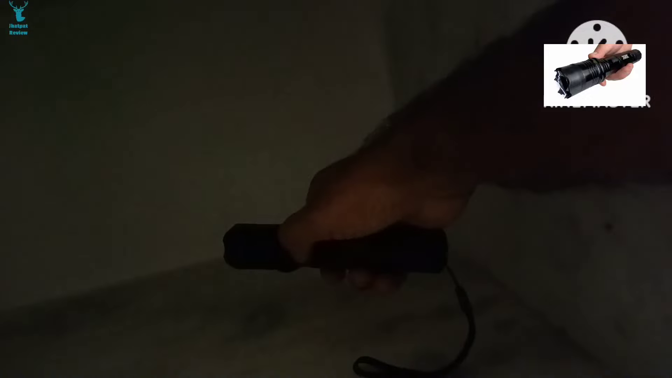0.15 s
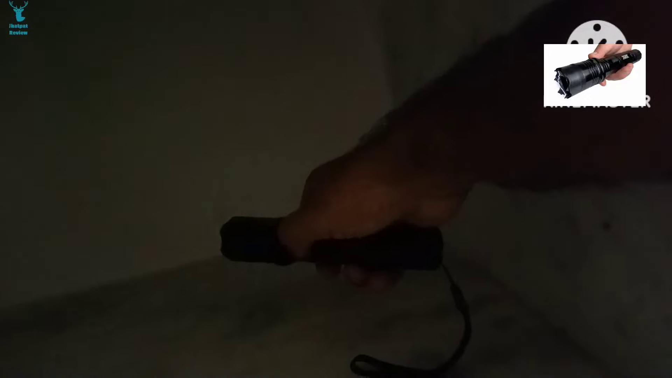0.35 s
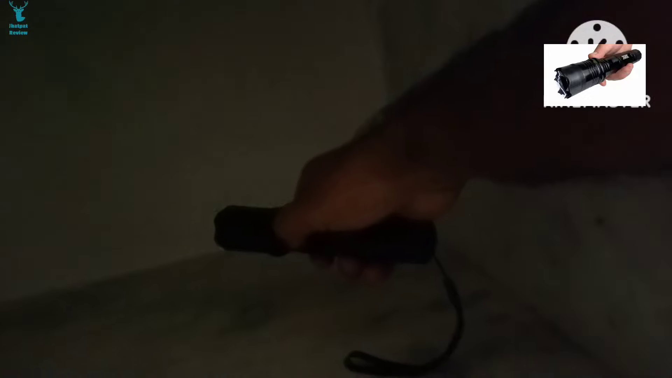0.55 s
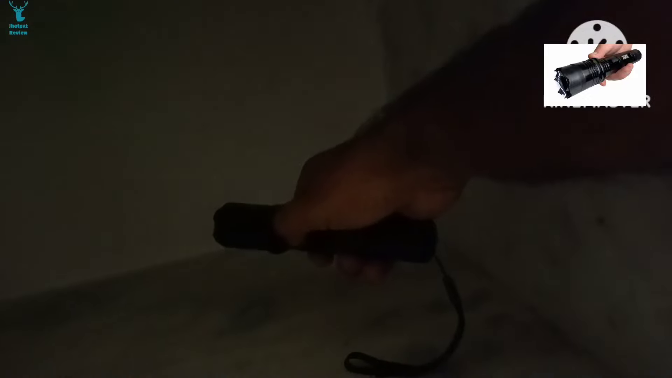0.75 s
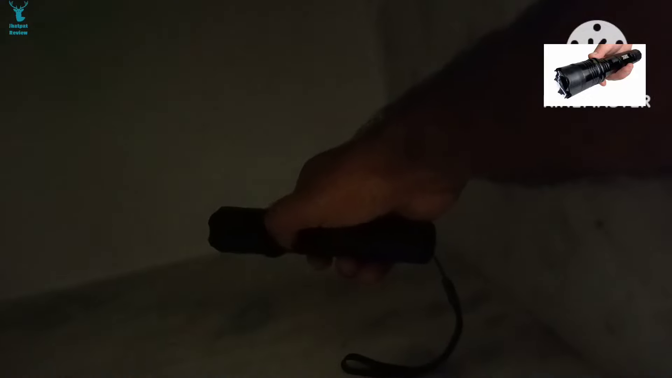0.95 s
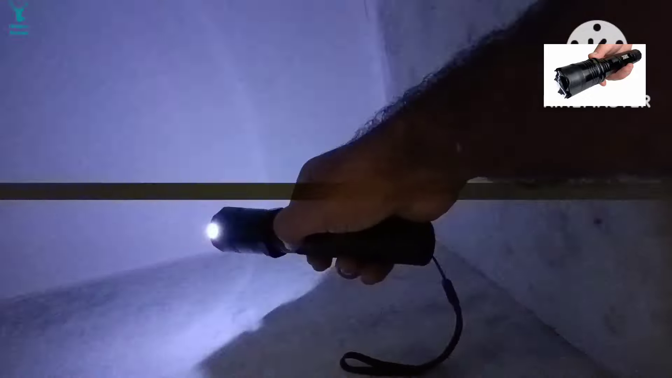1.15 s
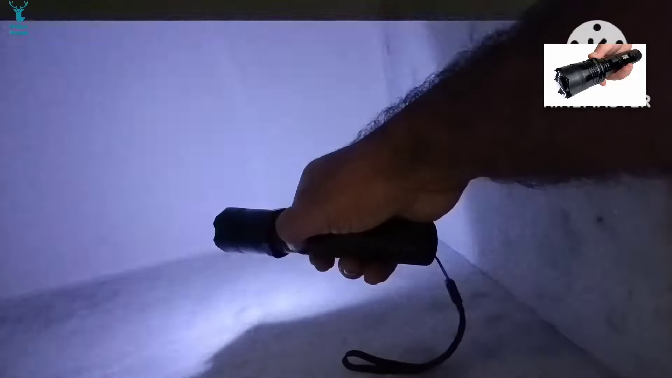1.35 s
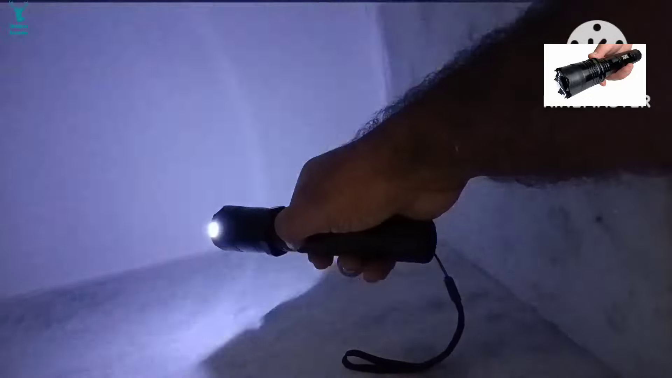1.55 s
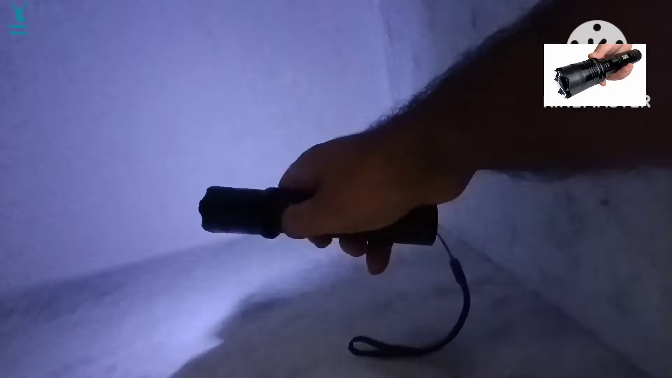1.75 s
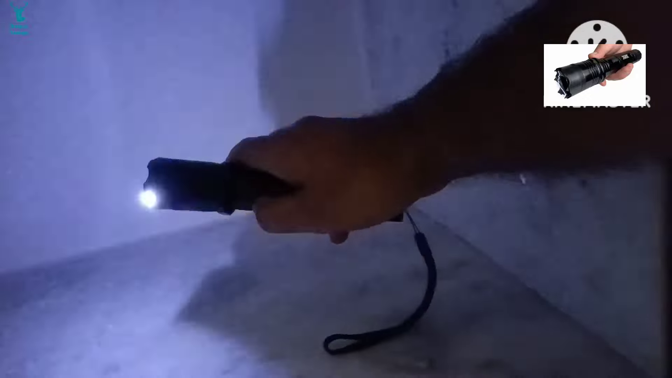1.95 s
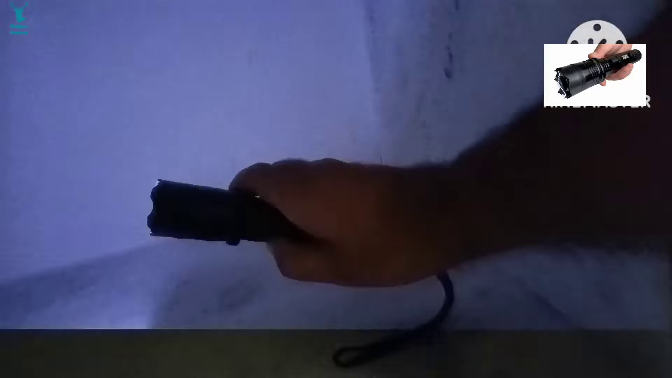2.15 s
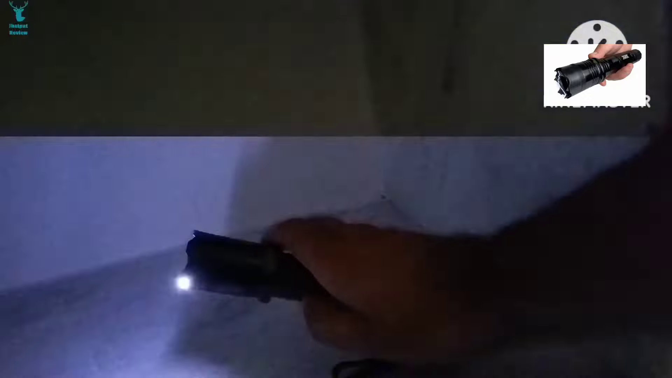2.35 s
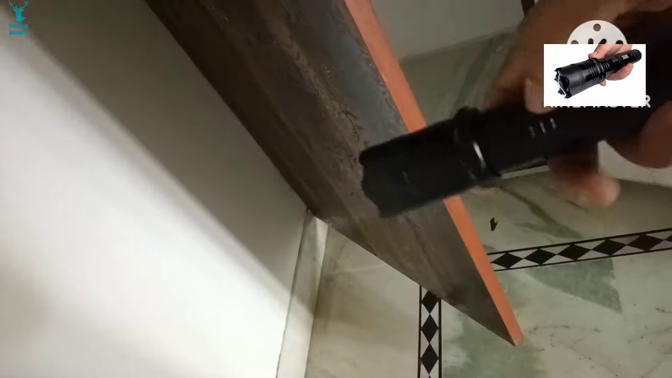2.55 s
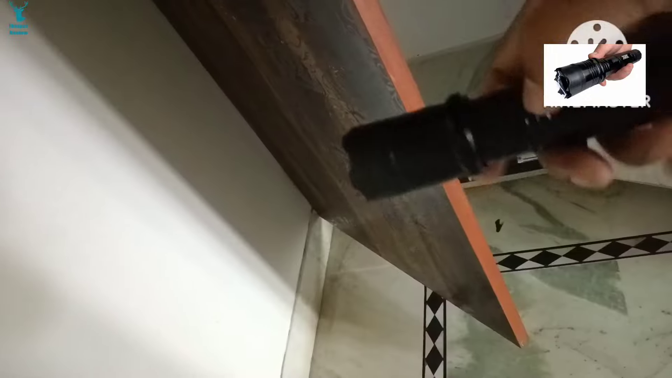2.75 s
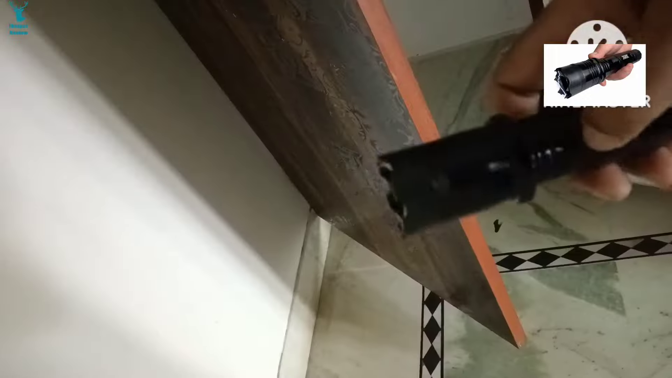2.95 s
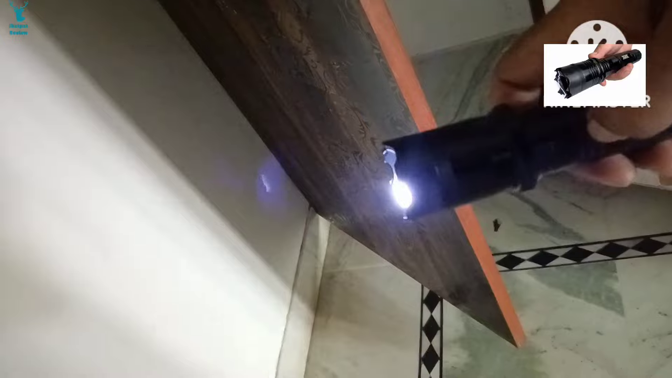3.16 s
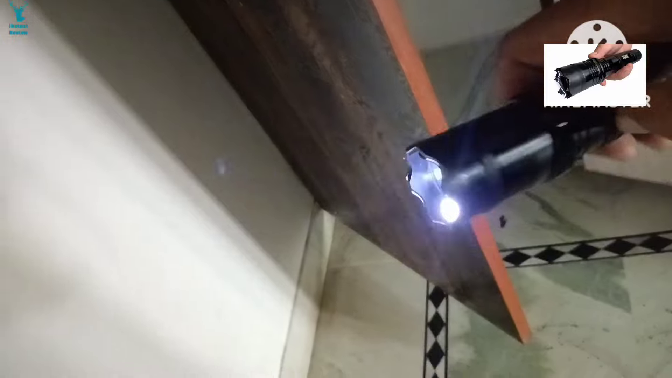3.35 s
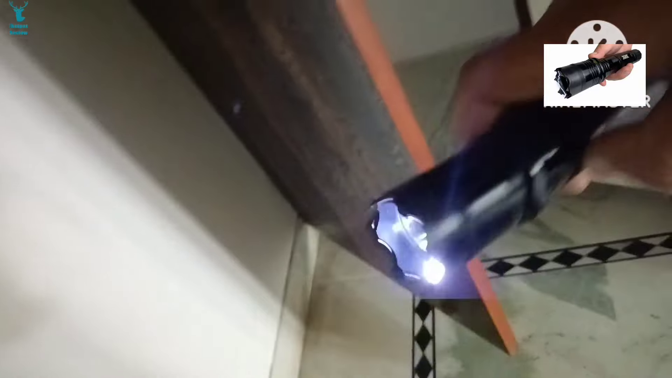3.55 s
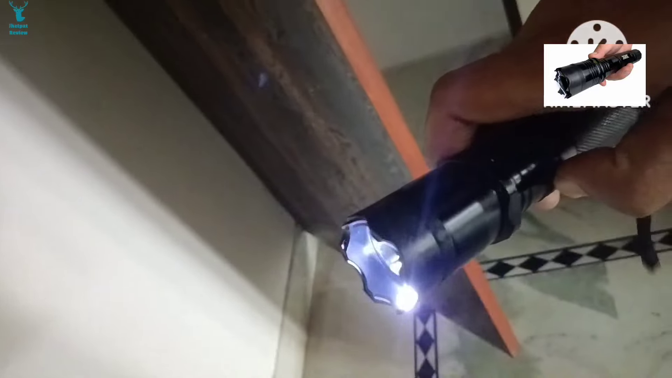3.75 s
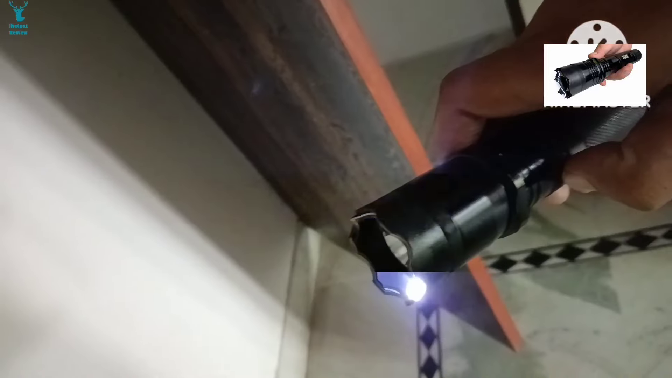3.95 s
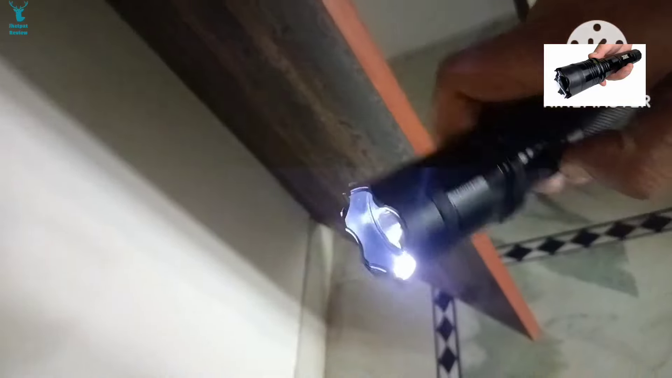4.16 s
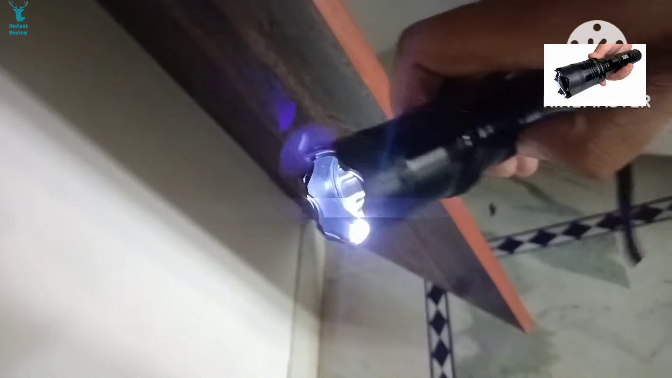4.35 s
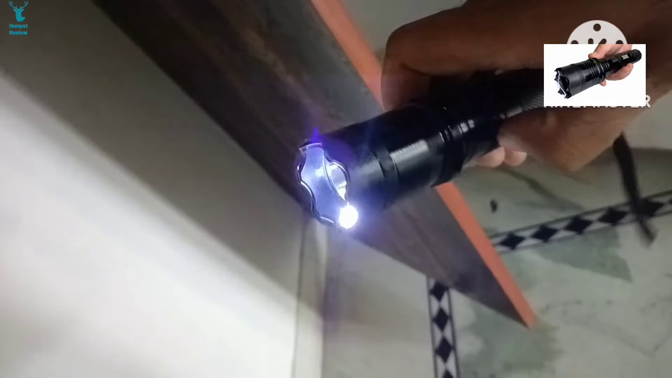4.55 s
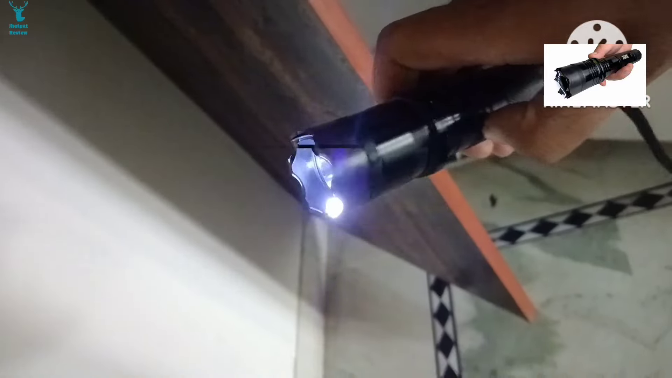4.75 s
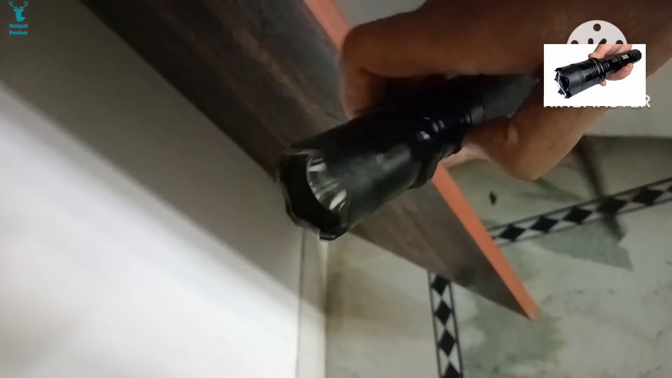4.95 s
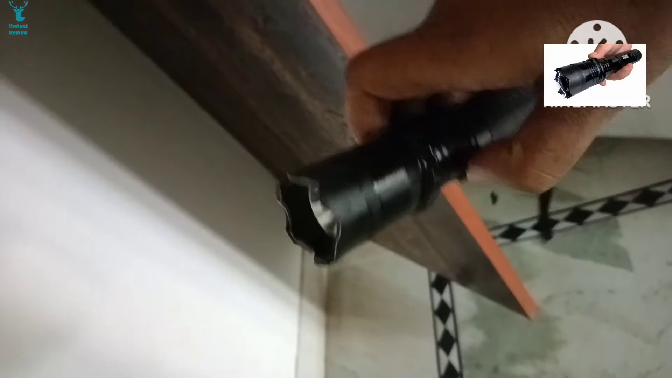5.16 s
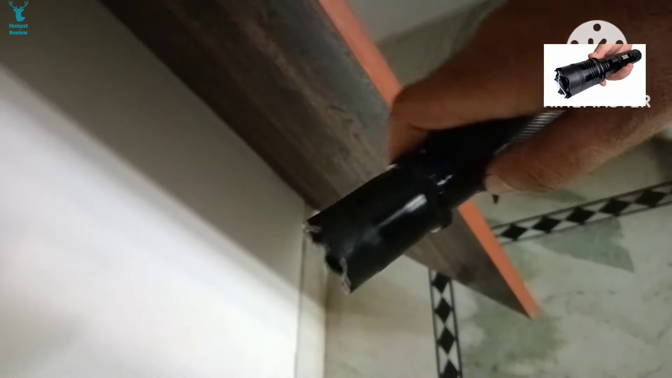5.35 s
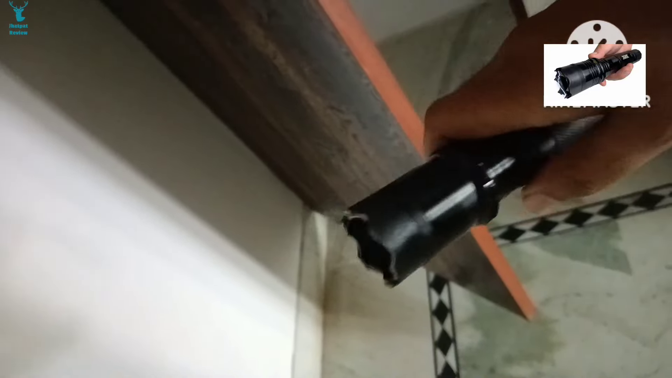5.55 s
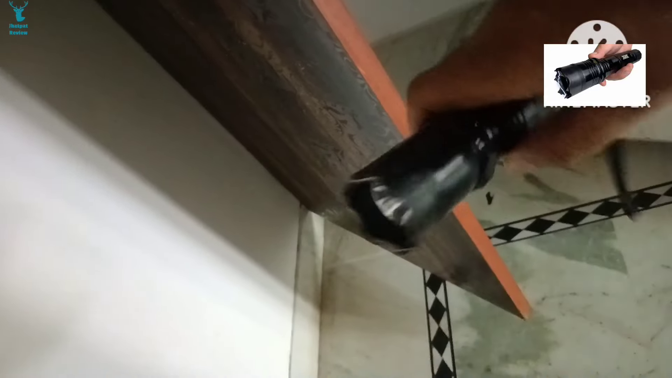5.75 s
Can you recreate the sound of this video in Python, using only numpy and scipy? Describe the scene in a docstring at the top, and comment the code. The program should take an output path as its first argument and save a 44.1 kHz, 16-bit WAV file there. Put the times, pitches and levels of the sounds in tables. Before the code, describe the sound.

A handheld stun device crackles in two harsh rapid bursts in a bare stone hallway, each leaving a bright, hissing echo.

```python
"""A stun gun fires two bursts of about thirty sparks a second in a bare stone hallway: first in a tight corner,
then in a doorway. Each spark is a clipped noise crack, a thump and sharp shock fronts, as it overloads a small
microphone whose port whistles near 9 kHz. The hall answers with filtered noise, a long bright hiss that swells when
the limiter lets go. The tail of an earlier burst fades at the start, the switch clicks before each burst,
a hand squeaks on the barrel, and low room modes ring under faint room noise."""
import sys
import numpy as np
from scipy import signal
from scipy.fft import rfft, irfft
from scipy.io import wavfile
from scipy.ndimage import uniform_filter1d, minimum_filter1d

SR = 44100
rng = np.random.default_rng(int(sys.argv[2]) if len(sys.argv) > 2 else 0)


def store_wav(level_fs):
    """Save 16-bit WAV to argv[1]."""
    pcm = np.round(np.clip(np.atleast_2d(level_fs), -1, 1) * 32767)
    wavfile.write(sys.argv[1], SR, pcm.T.astype(np.int16))


N = 256662

# colour of the overloaded crack: (frequency [Hz], level [dB])
CRACK_COLOUR = [(60, -25.5), (200, -1.5), (1000, 0), (2000, 0), (4000, -3), (6500, -6.5), (9000, -1.5),
                (12000, -2.5), (15500, 2.5)]
# colour of the low thump: (frequency [Hz], level [dB])
THUMP_COLOUR = [(20, -23), (45, -22), (90, -1.5), (170, 0), (300, -4), (700, -8.5), (2000, -25.5)]

TIME = np.arange(N) / SR
FREQS = np.maximum(np.arange(N // 2 + 1) * SR / N, 1)
MOVE_S = 2.684     # the corner scene has nearly faded by here
EARLIER_END_S = -0.23     # last spark of the earlier burst
CEILING_S = 0.0133     # delay of the echo from the ceiling
PORT_HZ = 9164     # whistle of the microphone port
MAKEUP_DB = 10.0     # gain of the limiter while all is quiet


def corner(rows):
    """Close walls throw shock fronts back, keep the microphone overloaded for long and leave a bright flutter."""
    times, level_db = rows.T
    sparks = discharges(rows, overload_s=0.017, length_spread=0.06, thump_db=-7.5, thump_spread_db=4.0)
    direct = cracks(sparks, crack_db=-0.73, fall=0.36, dip=0.02, port_db=15, thump_lag_s=0.0083)
    direct = direct * clumps(rough_db=1.5, size=50)

    fronts = shock(times, level_db - 5.0, swing_hz=1095, swing_t60=0.0017, tick_db=16)
    fronts += bounces(sparks, bounce_db=-12.5, swing_hz=1200, swing_t60=0.0031, tick_db=12.5, count=3)
    fronts = port(fronts, peak_db=15.0, width_hz=760)

    flutter = reflections(times, alike=0.18) * dying(times, t60=0.21) * clumps(rough_db=7.5, size=60)
    walls = from_db(-23.5) * port(flutter, peak_db=19.5, width_hz=780)

    # a quick fade, with the reverberation included
    fade = 1 - np.tanh(np.maximum(TIME - MOVE_S + 0.032, 0) / 0.018)
    return (direct + fronts + walls + hall(times, level_db=-35.5)) * fade


def doorway(rows):
    """In more space the cracks are short and double (direct, then off the door); the ceiling answers each."""
    # knock and thump of the sparks, changing through the burst:
    # (time [s], knock level relative to the spark before trims [dB], knock centre [Hz], thump level [dB])
    knock_and_thump = [(3.2, 6.5, 1270, -18), (3.27, 5, 1410, -13.5), (3.35, -1.5, 1400, -2),
                       (3.48, -3.5, 1370, -13.5), (3.58, -7, 1480, -6.5), (4.2, -7.5, 1330, -6),
                       (4.37, 2.5, 1480, -2.5), (4.45, 1, 1900, -8.5), (4.781, -2, 1640, -6.5),
                       (5.06, 2, 1354, -4.5)]
    point_s, *columns = np.transpose(knock_and_thump)
    knock_db, knock_hz, thump_db = (np.interp(rows[:, 0], point_s, column) for column in columns)

    sparks = discharges(rows, overload_s=0.0023, length_spread=0.22, thump_db=thump_db, thump_spread_db=2.5)
    times, level_db, length, low_db = sparks.T
    direct = cracks(sparks, crack_db=2.5, fall=0.12, dip=0.58, port_db=15.5, thump_lag_s=0.0035)

    # the direct front, then a second with a weaker tick
    knock_level_db = level_db + knock_db
    fronts = shock(times, knock_level_db - 3.1, swing_hz=knock_hz, swing_t60=0.0041, tick_db=16.0)
    second_s = times + 0.49 * length
    fronts += shock(second_s, knock_level_db - 4.5, swing_hz=1.294 * knock_hz, swing_t60=0.0087, tick_db=2.5)
    # opposite swing after the overload, then a low front at the ceiling delay
    fronts -= shock(times + 1.2 * length, low_db - 7.0, swing_hz=477, swing_t60=0.0076, tick_db=11.5)
    fronts += shock(times + CEILING_S, low_db - 16.5, swing_hz=330, swing_t60=0.009, tick_db=6)
    fronts = port(fronts, peak_db=11.0, width_hz=700)

    echoes = slap(times, delay_s=0.0049, level_db=-15.5, t60=0.022)
    echoes = echoes + slap(times, delay_s=CEILING_S, level_db=-14.0, t60=0.02)
    boom = from_db(-12) * coloured(noise() * dying(times + 0.0011, t60=0.14), THUMP_COLOUR)
    return direct + fronts + echoes + boom + hall(times, level_db=-34.0)


def discharges(rows, overload_s, length_spread, thump_db, thump_spread_db):
    """Longer capacitor charging gives longer overload, plus chance: (s, crack dB, overload s, thump dB)."""
    usual_charge_s, longest_charge_s = 0.033, 0.047     # at the longest the capacitor is full
    overload_growth = 0.25     # overload length follows charging time to this power
    strength_kept = 0.76     # share of the sparks' differences in dB that survives the overload
    times, level_db = rows.T
    draws = np.clip(rng.standard_normal((len(times), 2)), -1.5, 1.5)

    gaps = np.diff(times, prepend=times[0] - usual_charge_s)
    charge = np.minimum(gaps, longest_charge_s) / usual_charge_s
    length = overload_s * charge ** overload_growth * np.exp(length_spread * draws[:, 0])
    crack_db = level_db.mean() + strength_kept * (level_db - level_db.mean())
    return np.column_stack([times, crack_db, length, thump_db + thump_spread_db * draws[:, 1]])


def cracks(sparks, crack_db, fall, dip, port_db, thump_lag_s):
    """Each spark: clipped noise while the microphone is overloaded, and a longer thump as it recovers."""
    times, level_db, length, low_db = sparks.T
    crack_noise = np.tanh(2 * reflections(times, alike=0.45))
    crack = crack_noise * plateaus(times, level_db + crack_db, length, fall, dip)
    thump = np.tanh(2 * noise()) * plateaus(times, low_db, length + thump_lag_s, fall=0.2, dip=0)
    return port(coloured(crack, CRACK_COLOUR), port_db, width_hz=970) + coloured(thump, THUMP_COLOUR)


def plateaus(times, levels_db, lengths, fall, dip):
    """An overload holds for its length, sags between direct sound and wall echo, then collapses."""
    power, age = np.zeros(N), np.arange(SR // 16) / SR
    for s, db, length in zip(times, levels_db, lengths):
        phase = age / max(length, 1e-4)     # 1 at the end of the overload
        sag = 1 - np.clip(dip, 0, 0.95) * np.sin(np.pi * np.minimum(phase, 1)) ** 2
        collapse = (1 - np.tanh((phase - 1) / fall)) / 2
        at = round(s * SR)
        power[at:at + len(age)] += (from_db(db) * sag) ** 2 * collapse
    return np.sqrt(power)


def shock(times, levels_db, swing_hz, swing_t60, tick_db):
    """A shock front: a one-sample tick and a damped swing whose pitch differs with every path of the arc."""
    out, age = np.zeros(N), TIME[:SR // 50]
    octaves = 0.36 * np.clip(rng.standard_normal(len(times)), -2, 2)
    pitches = swing_hz * 2 ** octaves
    for s, db, hz in zip(times, levels_db, pitches):
        pulse = -np.sin(2 * np.pi * hz * age) * from_db(-60 * age / swing_t60)
        pulse[0] -= from_db(tick_db)
        at = round(s * SR)
        out[at:at + len(age)] += from_db(db) * pulse
    return out


def bounces(sparks, bounce_db, swing_hz, swing_t60, tick_db, count):
    """Each shock front comes back a few times, at chance moments during the overload."""
    times, level_db, length, _ = sparks.T
    shares = rng.random((len(times), count)).T
    return sum(shock(times + share * length, level_db + bounce_db, swing_hz, swing_t60, tick_db)
               for share in shares)


def slap(times, delay_s, level_db, t60):
    """A hard surface sends every crack back, thinner and with a strength of its own."""
    draws = rng.standard_normal((len(times), 2))
    arrivals = times + delay_s + 0.00019 * draws[:, 0]
    energy = from_db(level_db + 3.6 * draws[:, 1]) ** 2
    echo = noise() * dying(arrivals, t60, energy)
    thin = signal.lfilter([1, -0.45], [1], echo)     # tilts towards the treble
    return port(coloured(thin, CRACK_COLOUR), peak_db=10.5, width_hz=1100)


def reflections(times, alike):
    """Dense reflections whose pattern partly repeats from spark to spark, as the hand hardly moves."""
    starts, index = np.round(times * SR).astype(int), np.arange(N)
    latest = np.maximum(np.searchsorted(starts, index, "right") - 1, 0)
    since = index - starts[latest]     # samples since the latest spark
    alike = np.clip(alike, 0, 1)
    return np.sqrt(alike) * noise()[since] + np.sqrt(1 - alike) * noise()


def clumps(rough_db, size):
    """Reflections arrive in bunches about a millisecond long: a gain of mean power 1."""
    bunches = uniform_filter1d(noise(), size) * np.sqrt(size)
    gain = from_db(rough_db * np.clip(bunches, -2, 2))
    return gain / np.sqrt(np.mean(gain ** 2))


def hall(times, level_db):
    """Diffuse reverberation: noise bands that die at their own rates, as the air eats the treble first."""
    # bands of the hall: (centre [Hz], relative level [dB], decay by 60 dB [s])
    bands = [(49.9, -31, 1.8), (163, -20.5, 1.7), (452, -21.5, 2.86), (1024, -11.5, 2.37), (1530, -2, 1.77),
             (1910, -1, 2.26), (2490, -3, 1.87), (3500, -4.5, 1.92), (5000, -4.5, 1.57), (7300, -0.5, 1.27),
             (8540, 4.5, 0.99), (10870, 4.5, 0.75), (13200, 9.5, 0.6), (15500, 10.5, 0.45)]
    build_s = 0.013     # time constant of the reverberation filling the hall
    log_hz, response, white = np.log([row[0] for row in bands]), 0, rfft(noise())
    # each share is 1 at its own centre and slopes to 0 at the neighbours
    for share, (_, db, t60) in zip(np.eye(len(bands)), bands):
        band = irfft(white * np.interp(np.log(FREQS), log_hz, share), N)
        response = response + band * from_db(db - 60 * TIME / t60)
    response = response * (1 - np.exp(-TIME / build_s))
    return from_db(level_db) * port(echoing(times, response), peak_db=25, width_hz=903)


def echoing(times, response, sizes=0.86):
    """Every spark (also those of the second before the start) sets off the same response."""
    train = np.zeros(SR + N)
    train[np.round((np.asarray(times) + 1) * SR).astype(int)] = sizes
    return signal.fftconvolve(train, response)[SR:SR + N]


def earlier_burst():
    """Only the reverberation of a burst that has just stopped is left."""
    gaps = rng.uniform(0.026, 0.042, 20)
    times = EARLIER_END_S + gaps[0] - np.cumsum(gaps)     # backwards from the last spark
    return hall(np.maximum(times, -1), level_db=-34.5)


def handling():
    """Noise snaps of the plastic switch, and the thin resonant squeak of the hand sliding on the barrel."""
    # switch and grip snaps: (time [s], level before trim and colour [dB], decay by 60 dB [s])
    clicks = [(0.578, -38, 0.13), (1.071, -31, 0.14), (1.124, -47, 0.22), (1.203, -52, .06),
              (1.283, -41.5, 0.69), (3.1819, -14, 0.0083), (3.183, -37, 0.13)]
    # hand sliding on the barrel: (time [s], level before trim [dB])
    grip = [(2.7, -70), (2.8, -65), (2.92, -62), (3.02, -65), (3.05, -52.5), (3.08, -65), (3.17, -72)]
    # colour of the plastic: (frequency [Hz], level [dB])
    plastic = [(100, -22), (1500, -5), (4500, -9), (6500, -6), (9000, 6.5), (12000, -3), (15500, -4.5)]
    snaps = noise() * sum(dying([s], t60) * from_db(db - 17.5) for s, db, t60 in clicks)
    slide_db = np.interp(TIME, *np.transpose(grip), left=-120, right=-120)
    slide = noise() * from_db(slide_db - 14)
    squeak = from_db(18.5) * signal.lfilter(*signal.iirpeak(9550, 32, fs=SR), slide)
    return port(coloured(snaps + 0.402 * slide, plastic), peak_db=7.5, width_hz=710) + squeak


def quiet_room():
    """Faint room noise with a hollow tone near 2 kHz, and the low ring and rumble that bursts leave behind."""
    # colour of the room noise: (frequency [Hz], level [dB])
    room_colour = [(25, -4), (100, -3), (300, 3), (700, -3.5), (2000, -5), (4000, -13), (9000, -14.5),
                   (15500, -21.5)]
    # colour of the rumble: (frequency [Hz], level [dB])
    rumble_colour = [(35, -18.0), (80, 2.0), (160, -8), (400, -20)]
    corner_end_s = 2.58
    ring = room_ring(EARLIER_END_S, level_db=-3) + room_ring(corner_end_s, level_db=-7.5)
    # steady noise, raised after the corner burst
    air = noise() * (from_db(-64) + from_db(-54.0) * dying([corner_end_s], t60=2.25))
    hollow = from_db(-11.0) * signal.lfilter(*signal.iirpeak(2000, 4, fs=SR), air)
    rumble = from_db(-46) * coloured(noise() * dying([0], t60=1.9), rumble_colour)
    return ring + rumble + hollow + coloured(air, room_colour)


def room_ring(start_s, level_db):
    """The low modes of the room die away slowly, wavering as close pairs of sines beat."""
    # low modes that outlast a burst: (frequency [Hz], relative level [dB], decay by 60 dB [s])
    modes = [(159, -66.5, 2.6), (217, -71, 5), (281, -46.5, 0.68), (327, -67, 3.2), (470, -65, 2.7),
             (567, -62, 1.34), (605, -66, 1.9), (880, -66, 2.9), (1080, -69, 2.6)]
    age, out = np.maximum(TIME - start_s, 0), 0
    for (hz, db, t60), split_hz in zip(modes, rng.uniform(1, 10.0, len(modes))):
        pair = np.sin(2 * np.pi * hz * age) + 0.44 * np.sin(2 * np.pi * (hz + split_hz) * age)
        out = out + pair * from_db(level_db + db - 60 * age / t60)
    return out


def port(x, peak_db, width_hz):
    """The air in the microphone port rings: a resonant peak is added to the sound."""
    b, a = signal.iirpeak(PORT_HZ, PORT_HZ / width_hz, fs=SR)
    return x + (from_db(peak_db) - 1) * signal.lfilter(b, a, x)


def dying(times, t60, energy=0.94):
    """Envelope of a reverberation fed with a packet of energy at each time."""
    packets = np.zeros(N)
    packets[np.clip(np.round(np.asarray(times) * SR).astype(int), 0, N - 1)] = energy
    kept = from_db(-120 / (t60 * SR))     # share of the energy left after one sample
    return np.sqrt(signal.lfilter([1], [1, -kept], packets + 1e-18))


def coloured(x, points):
    """Causal (minimum-phase) filter through the (Hz, dB) points, by folding the cepstrum."""
    hz, db = np.transpose(points)
    gain = from_db(np.interp(np.log(FREQS), np.log(hz), db))
    cepstrum = irfft(np.log(gain), N)
    cepstrum[1:N // 2] *= 2
    cepstrum[N // 2 + 1:] = 0
    return irfft(rfft(x) * np.exp(rfft(cepstrum)), N)


def noise():
    """White noise of rms 1."""
    return rng.standard_normal(N)


def from_db(db):
    """Decibels to gain."""
    return 10 ** (np.asarray(db) / 20)


def scene():
    """Both bursts, the fading earlier one and the small sounds, alike in both channels."""
    # the arc jumps the gap: (time [s], spark level before overload and trims [dB])
    sparks = np.array([(1.321, -4), (1.3532, -6.5), (1.3768, -12.5), (1.4094, -10), (1.4455, -6.5),
                       (1.47, -9), (1.5088, -6.5), (1.5416, -7), (1.5759, -11), (1.6089, -10.5),
                       (1.6472, -9.5), (1.6779, -12), (1.7102, -9), (1.7396, -9.5), (1.7812, -8.5),
                       (1.8229, -8), (1.8693, -7.5), (1.9037, -9), (1.9349, -4.5), (1.9674, -6),
                       (2.0001, -8), (2.0459, -6), (2.0752, -8), (2.1017, -9), (2.139, -5.5), (2.1778, -8),
                       (2.2218, -6.5), (2.2661, -5.5), (2.2988, -9.5), (2.3312, -9), (2.3778, -3),
                       (2.4145, -5.5), (2.4508, -7.5), (2.4922, -7), (2.5501, -7), (3.2037, -8.5),
                       (3.2368, -14), (3.27, -9), (3.3014, -11), (3.3386, -11), (3.3754, -11),
                       (3.4065, -8.5), (3.447, -10), (3.4865, -5.5), (3.5217, -10.5), (3.5627, -5.5),
                       (3.6008, -3), (3.6371, -5), (3.682, -6.5), (3.7232, -6.5), (3.7645, -6),
                       (3.7939, -3), (3.827, -9.5), (3.8653, -7), (3.9022, -5.5), (3.9374, -6.5),
                       (3.9798, -9), (4.0183, -4.5), (4.0489, -10), (4.0873, -12.5), (4.1164, -7),
                       (4.1517, -9.5), (4.1858, -3), (4.2216, -6.5), (4.2486, -8), (4.2764, -5.5),
                       (4.3112, -5.5), (4.347, -10), (4.367, -12), (4.4073, -7), (4.4344, -8),
                       (4.4613, -10), (4.4896, -4), (4.5194, -7.5), (4.5487, -9), (4.5781, -9),
                       (4.6116, -10), (4.6427, -11.5), (4.6719, -14), (4.7073, -7.5), (4.742, -9),
                       (4.7697, -7.5), (4.797, -7), (4.8214, -10), (4.8511, -6), (4.8835, -13),
                       (4.9167, -7.5), (4.9469, -10), (4.9755, -10), (5.0128, -12), (5.0601, -11.5)])
    first = sparks[:, 0] < MOVE_S
    bursts = corner(sparks[first]) + doorway(sparks[~first])
    mono = bursts + earlier_burst() + handling() + quiet_room()
    return np.array([mono, mono])


def limiter(x, threshold_db, hold_s, release_db_per_s):
    """Peaks take away the make-up gain almost at once; it is held down briefly and then creeps back."""
    peak_db = 20 * np.log10(np.abs(x).max(axis=0) + 1e-9)
    over = np.clip(peak_db - threshold_db, 0, MAKEUP_DB)
    span = 2 * int(hold_s * SR / 2) + 1
    held = -minimum_filter1d(-over, span, origin=span // 2)
    # a running maximum on a rising ramp lets the reduction fall only at the release rate
    ramp = release_db_per_s * TIME
    reduction = np.maximum.accumulate(held + ramp) - ramp
    return x * from_db(MAKEUP_DB - uniform_filter1d(reduction, size=64))


def record(dry):
    """Low cut, limiter, rounded peaks and a steep top cut."""
    low_cut_hz, top_cut_hz = 45, 15650
    top = 0.82     # ceiling of the rounded peaks
    dry = signal.sosfilt(signal.butter(2, low_cut_hz, "high", fs=SR, output="sos"), dry)
    level = limiter(dry, threshold_db=-11, hold_s=0.03, release_db_per_s=85)
    loud = top * np.tanh(level / top)
    return signal.sosfilt(signal.ellip(12, 0.2, 85, top_cut_hz, fs=SR, output="sos"), loud)


dry = scene()
out = record(dry)
store_wav(out)
```